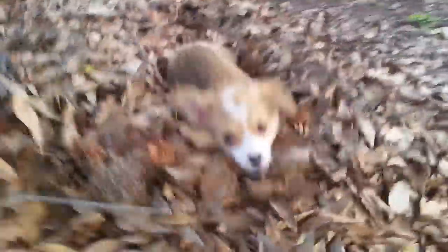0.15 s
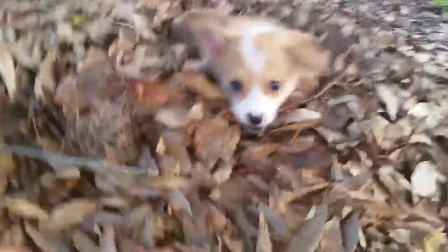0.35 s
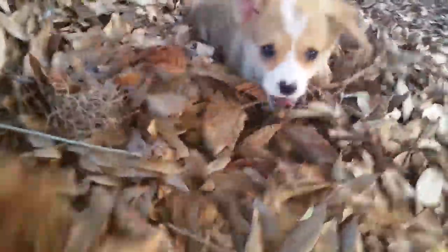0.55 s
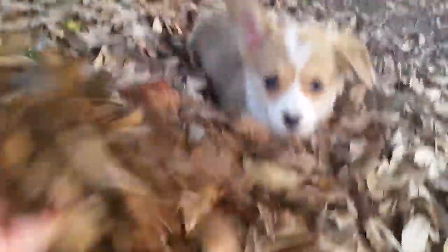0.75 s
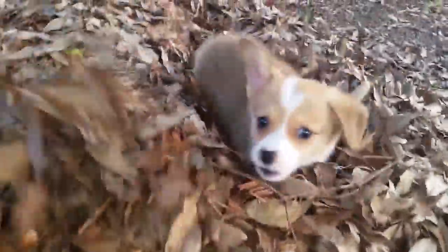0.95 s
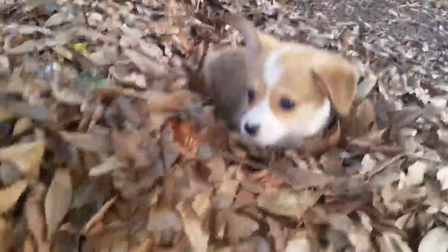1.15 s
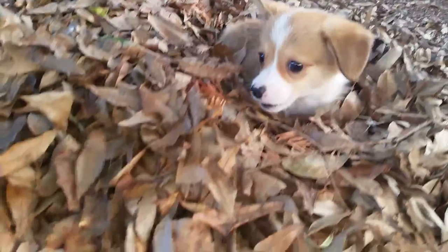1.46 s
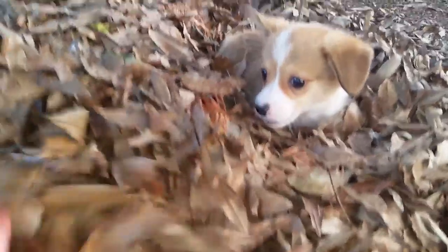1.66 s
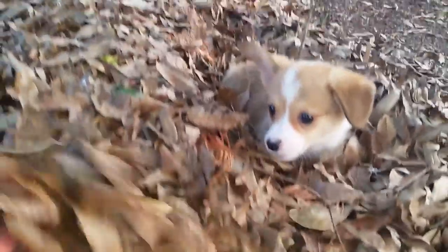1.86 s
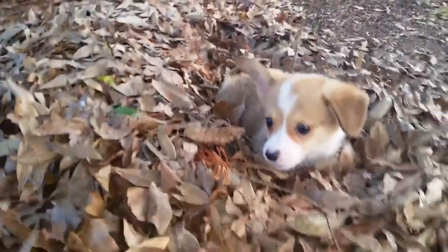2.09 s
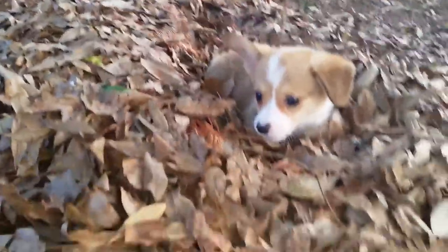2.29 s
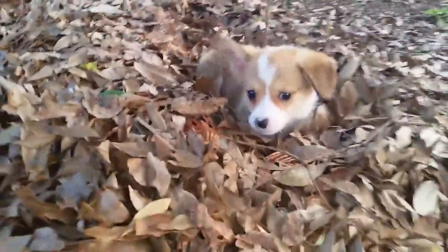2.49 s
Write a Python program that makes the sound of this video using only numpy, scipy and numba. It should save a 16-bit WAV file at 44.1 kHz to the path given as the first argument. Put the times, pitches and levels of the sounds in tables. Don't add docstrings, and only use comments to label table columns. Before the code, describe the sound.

Crisp dead leaves crackling and sliding close by in uneven bursts, with a low far-off engine drone

```python
import sys
import numpy as np
from scipy import signal
from scipy.fft import rfft, irfft
from scipy.io import wavfile
from scipy.ndimage import uniform_filter1d
from numba import njit

SR = 44100
rng = np.random.default_rng(int(sys.argv[2]) if len(sys.argv) > 2 else 0)


def file_out(sig):
    cols = np.atleast_2d(sig).T
    lim = np.clip(cols, -1, 1)
    pcm = np.round(lim * 32767).astype(np.int16)
    wavfile.write(sys.argv[1], SR, pcm)


def invert_db(level):
    return 10 ** (np.asarray(level, dtype=float) / 20)


N = 115983
RIGHT_LATE_S = 0.00024


def unit(x):
    return x / np.sqrt(np.mean(x ** 2))


def column(table, count):
    table = np.array(table, float)
    return np.interp(np.arange(N) / SR, table[:, 0], table[:, count])


def high_pass(x, hz, order=1):
    return signal.lfilter(*signal.butter(order, hz, "high", fs=SR), x)


def colour(x, points):
    hz, db = np.array(points, float).T
    grid = np.arange(4097) * SR / 8192 + 1
    cepstrum = irfft(np.interp(np.log(grid), np.log(hz), db) * np.log(10) / 20)
    cepstrum[1:4096] *= 2
    cepstrum[4097:] = 0
    return signal.fftconvolve(x, irfft(np.exp(rfft(cepstrum))))[:N]


def walk(rate):
    k = int(SR / rate)
    held = np.repeat(rng.standard_normal(N // k + 1), k)
    return unit(uniform_filter1d(uniform_filter1d(held, k), k)[:N])


@njit
def ring(length, start, hz, cycles, size, sr):
    out = np.zeros(length)
    for g in range(len(start)):
        i = int(np.ceil(start[g]))
        s = hz[g] / sr * (2j * np.pi - 1 / cycles[g])
        z, p = size[g] * np.exp(s * (i - start[g])), np.exp(s)
        for k in range(max(i, 0), min(i + int(6 * cycles[g] * sr / hz[g]), length)):
            out[k] += z.imag
            z *= p
    return out


def at_ports(s, hz, cycles, size):
    place = rng.standard_normal((len(s), 2)).T
    late = RIGHT_LATE_S + 0.000065 * place[0]
    lean = invert_db(3 * place[1] / 2)
    left = ring(N, s * SR, hz, cycles, size * lean, 1. * SR)
    right = ring(N, (s + late) * SR, hz, cycles, size / lean, 1. * SR)
    return np.array([left, right])


# frequency in Hz, density in dB per Hz.
TRAFFIC_SPECTRUM = [(12, -64), (30, -8.5), (60, -7.5), (96, -1.5), (151, -6.5), (198, -10.5), (299, -16),
                    (600, -26.5), (780, -50.5), (1320, -120)]


def traffic():
    mid, side = (colour(rng.standard_normal(N), TRAFFIC_SPECTRUM) for _ in range(2))
    side = high_pass(side, 590) + invert_db(-14) * side
    return unit(np.array([mid + side, mid - side])) * invert_db(-42.5 + 0.89 * walk(3.2))


# time in seconds, pitch in Hz, level in dB, octave level in dB.
ENGINE_GLIDE = [(0, 91.86, -50.5, -57.5), (.15, 90.93, -56, -58), (.31, 90.2, -46, -50.5),
                (.4, 88.07, -60, -58), (.6, 81.94, -56.5, -57), (.86, 77.9, -48.5, -57.5),
                (.97, 77.2, -41.5, -46.5), (1.44, 77.4, -43, -58.5), (2.0, 77.47, -40.5, -48),
                (2.45, 77.4, -39, -58), (2.63, 75, -43, -51.5)]


def engine():
    hz = column(ENGINE_GLIDE, count=1) * (1 + 0.006 * walk(8))
    turn = 2 * np.pi * np.cumsum(hz) / SR
    tone, octave = column(ENGINE_GLIDE, count=2), column(ENGINE_GLIDE, count=3)
    # order, level dB, wobble dB, wobble rate Hz
    partials = ((1, tone, 1.9 * 1.3, 9.22), (2, octave, 2.8 * 1.3, 43), (0.62, tone - 11, 2.0 * 1.3, 23))
    return sum(np.sqrt(2) * invert_db(db + wobble * walk(rate)) * np.sin(order * turn)
               for order, db, wobble, rate in partials)


def grains(count, lo_hz, hi_hz, cycles, scatter_db):
    u = rng.random((count, 4)).T
    hz, turns = lo_hz + (hi_hz - lo_hz) * u[1], cycles * (0.39 + u[2]) / 3
    biggest_db = 2
    extra_db = biggest_db * np.tanh(-scatter_db * np.log(1 - u[3]) / biggest_db)
    size = np.sqrt(hz / turns) * invert_db(extra_db)
    return unit(at_ports(u[0] * N / SR, hz, turns, size))


def slide():
    alike_hz, late = 1820, int(round(RIGHT_LATE_S * SR))
    low = signal.lfilter(*signal.butter(1, alike_hz, fs=SR), rng.standard_normal(N))
    return np.array([low, np.roll(low, late)]) + high_pass(rng.standard_normal((2, N)), alike_hz)


# centre in seconds, extra level in dB, half length in seconds.
SHOVES = [(0.075, -1, .015), (.14, 3.5, 0.0096), (0.221, -1.5, 0.01), (0.175, 2, 0.013), (0.199, 1.5, .008),
          (.28, 0, .01), (0.358, 2.5, 0.0076), (0.536, 0, 0.0075), (0.75, 2.5, 0.023), (0.796, -1.5, 0.024),
          (1.266, 0.5, 0.018), (1.373, 2.5, 0.013), (1.512, 0, 0.018), (1.6, 1.5, 0.032),
          (1.696, 0.5, 0.0084), (1.775, 1.5, 0.017), (1.743, 3, 0.021), (2.103, 0.5, 0.018),
          (2.264, 3, 0.019), (2.523, 1.5, 0.018), (2.603, 2.5, 0.012)]


def shoves():
    t = np.arange(N) / SR
    return sum(db * np.exp(-((t - s) / half) ** 2) for s, db, half in SHOVES)


# time in seconds, rustle level in dB, weight on the pile in dB, left-right balance in dB.
SWEEP = [(0.0, -29.5, 9, -3), (0.11, -33.5, 10, -2.5), (0.14, -30.5, 9, -5), (0.25, -35.5, 8.5, -6.5),
         (0.28, -31.5, 9, -4.5), (0.56, -21, 4.5, -3), (0.99, -22.5, -8.5, -3), (1.19, -31, 4.5, -3.5),
         (1.297, -40, 8.5, -4), (1.312, -25.5, 6, -3), (1.37, -25.5, -13, -2.5), (1.41, -28.5, 5.5, -3),
         (1.55, -20.5, 2.5, -2.5), (2.12, -28, -26, -3), (2.2, -32.5, 7.5, -2.5), (2.22, -26, 1.5, -4.5),
         (2.61, -44.5, 13.5, -2.5), (2.63, -42, 12.5, -3)]


def rustle():
    clumps_db = 1.35 * walk(1100) + 0.5 * walk(60)
    cracks = grains(count=40000, lo_hz=277, hi_hz=19230, cycles=2.3, scatter_db=1)
    crunch = grains(count=9000, lo_hz=454, hi_hz=4600, cycles=2.2, scatter_db=3)
    crunch_db = -8 + column(SWEEP, count=2) + 0.73 * walk(10.9)
    pile = invert_db(clumps_db) * (cracks + invert_db(-2) * slide()) + invert_db(crunch_db) * crunch
    pan = column(SWEEP, count=3) / 2
    return pile * invert_db(4 + shoves() + column(SWEEP, count=1) + np.array([pan, -pan]))


# centre in seconds, level in dB, half length in seconds, pitch in Hz.
CRUMPLES = [(0.032, -43.5, 0.049, 900), (.175, -36, 0.024, 940), (0.172, -44, 0.025, 2400),
            (0.268, -44.5, .03, 900), (0.469, -36.5, 0.067, 3470), (.58, -35.5, .05, 3610),
            (.5, -37.5, 0.053, 5900), (0.699, -35, .08, 3340), (0.716, -36.5, .06, 2210),
            (0.897, -39, 0.056, 3640), (1.364, -45, 0.019, 7400), (1.466, -36.5, 0.029, 3400),
            (1.58, -42, 0.034, 1120), (1.598, -33, .05, 3630), (1.659, -33.5, 0.062, 8000),
            (2.109, -39, .015, 6240), (2.223, -39.5, 0.019, 3520), (2.27, -44.5, 0.022, 2700),
            (2.288, -37.5, .045, 6200)]


def crumples():
    s, db, half, hz = (np.repeat(c, 240) for c in np.array(CRUMPLES, float).T)
    u = rng.standard_normal((len(s), 3)).T
    hz = hz * np.exp(0.16 * u[1])
    size = invert_db(10 + db + 5 * u[2]) * np.sqrt(hz * half / 100)
    return at_ports(s + half * u[0] / np.sqrt(2), hz, 1.6 + 0 * s, size)


# start in seconds, peak level in dB, pitch in Hz.
SNAPS = [(0.092, -21, 12000), (0.134, -15, 12500), (0.1414, -13, 13900), (0.1468, -13, 12500),
         (0.177, -17, 9000), (0.278, -16, 12000), (0.337, -15, 11500), (0.4123, -14, 12000),
         (.4375, -11, 12500), (.4505, -13, 11000), (.679, -12, 12000), (.691, -12, 11000),
         (.726, -12, 12000), (.758, -11, 11500), (.7625, -10, 12500), (.7675, -11, 11000),
         (.7885, -11, 12000), (0.5405, -12, 11000), (0.571, -12, 12000), (0.5865, -12, 11000),
         (0.5965, -12, 12500), (0.6045, -11, 10500), (0.6135, -12, 12000), (0.6255, -12, 10500),
         (1.4497, -14, 12000), (1.4895, -13, 11500), (1.626, -10, 11000), (1.8294, -13, 11500),
         (2.0673, -13, 11500), (2.2535, -14, 12000), (2.297, -16, 7000), (2.312, -16, 12000),
         (2.3605, -20, 3000), (0.1894, -19, 12200), (0.3594, -15, 10500), (0.5294, -9, 11800),
         (0.6594, -9, 12000), (1.3127, -11, 11100), (1.3344, -14, 11300), (1.3553, -9, 13000),
         (1.3624, -9, 12500), (1.381, -13, 12000), (1.3684, -13, 11400), (1.5644, -8, 10100),
         (1.7294, -9, 11300), (2.0994, -16, 11400), (2.2129, -15, 12200), (2.2594, -14, 12100),
         (2.3394, -18, 12400), (2.3594, -18, 11400), (2.3894, -18, 12400), (2.4409, -21, 13700),
         (2.5224, -25, 12600), (2.5454, -27, 11000), (2.6274, -29, 14300)]


def snaps():
    s, db, hz = (np.repeat(c, 6) for c in np.array(SNAPS, float).T)
    u = rng.standard_normal((len(s), 3)).T
    s = s + 0.0005 * abs(u[0])
    hz = np.clip(hz * np.exp(0.14 * u[1]), 500, 17000)
    return at_ports(s, hz, 2.2 + 0 * s, invert_db(-5.5 + db + 1.2 * u[2]))


# start in seconds, peak level in dB.
THUDS = [
    (0.166, -33),
    (0.19, -29),
    (0.31, -28.5),
    (1.1, -24),
    (1.307, -32),
    (2.169, -38),
]


def thuds():
    s, db = np.array(THUDS, float).T
    return ring(N, s * SR, 400 + 0 * s, 0.28 + 0 * s, invert_db(2 + db), 1. * SR)


def grip(x, bumps):
    for hz, width, db in bumps:
        x = x + (invert_db(db) - 1) * signal.lfilter(*signal.iirpeak(hz, hz / width, fs=SR), x)
    return x


# frequency in Hz, level in dB.
LEFT_PORT = [(300, -20), (1200, -16.5), (2400, -14.5), (5000, -9), (8800, -6.5), (10500, -3), (12300, 7.5),
             (15500, 2)]
RIGHT_PORT = [(400, -22), (1600, -13.5), (2200, -9.5), (3500, -10.5), (5200, -10), (8000, -8.5),
              (10300, 5.5), (14200, -1)]
# frequency in Hz, width in Hz, level in dB.
LEFT_GRIP = [(1292, 370, -3), (4270, 3000, 1), (8820, 1500, -4.5)]
RIGHT_GRIP = [(1120, 340, 0.5), (1494, 260, -2.5), (2050, 500, 1), (2700, 390, -2.5), (3400, 2100, -0.3),
              (4900, 1000, -3), (14600, 3000, -2.5)]


def through_ports(leaves):
    left = grip(colour(leaves[0], LEFT_PORT), LEFT_GRIP)
    right = grip(colour(leaves[1], RIGHT_PORT), RIGHT_GRIP)
    return np.array([left, right])


def scene():
    air = invert_db(-46) * rng.standard_normal((2, N))
    leaves = high_pass(rustle() + crumples() + snaps() + air, 266, order=2)
    return traffic() + engine() + through_ports(leaves) + thuds()


def top_cut(x):
    return signal.sosfilt(signal.butter(12, 16840, fs=SR, output="sos"), x)


def record(dry):
    mix = high_pass(dry, 30, order=2)
    return top_cut(mix)


dry = scene()
out = record(dry)
file_out(out)
```